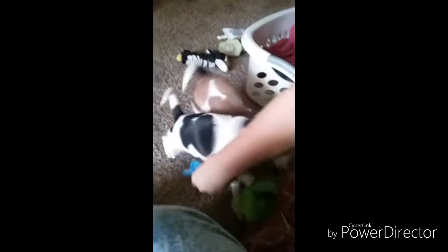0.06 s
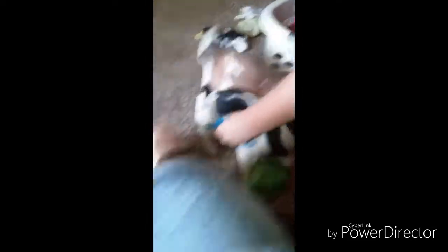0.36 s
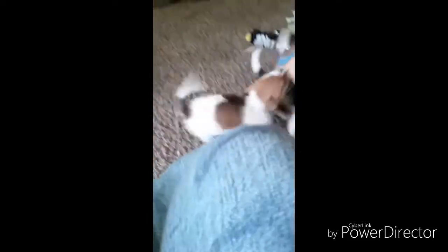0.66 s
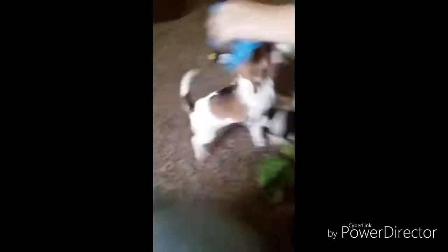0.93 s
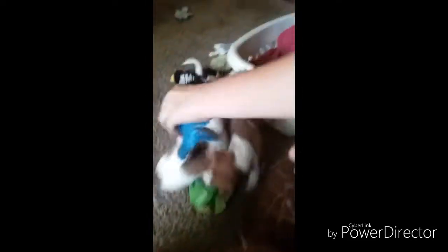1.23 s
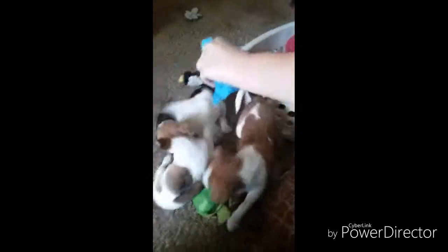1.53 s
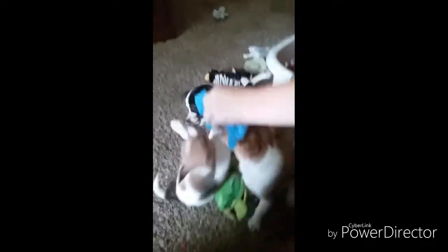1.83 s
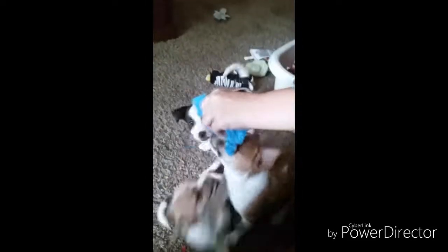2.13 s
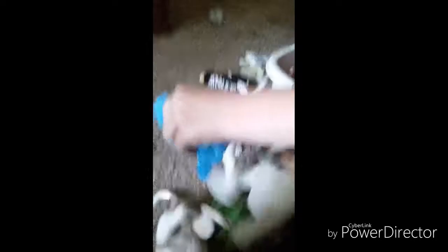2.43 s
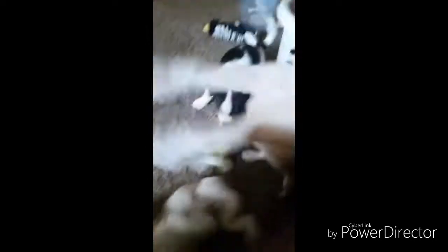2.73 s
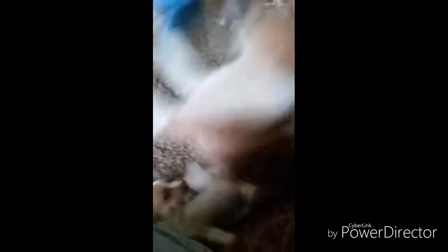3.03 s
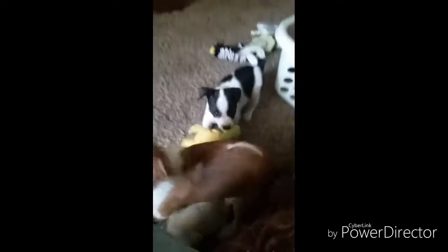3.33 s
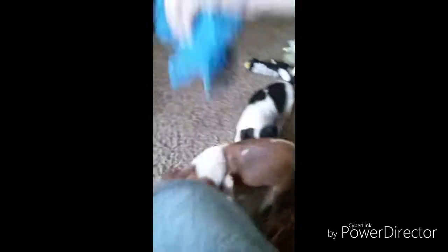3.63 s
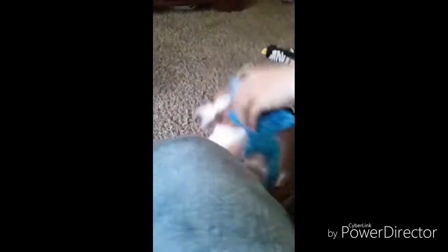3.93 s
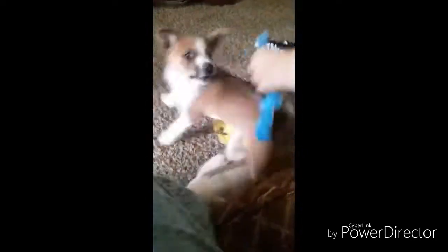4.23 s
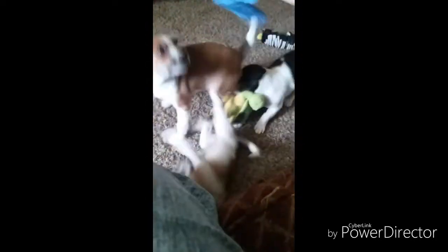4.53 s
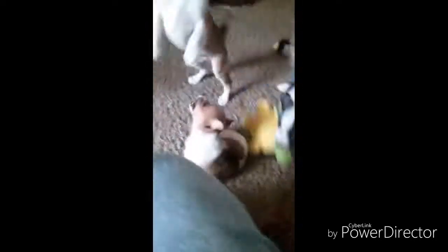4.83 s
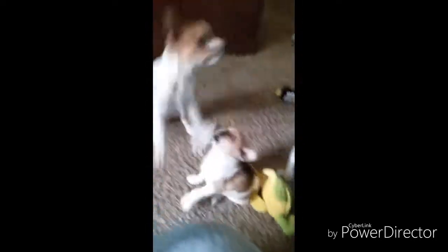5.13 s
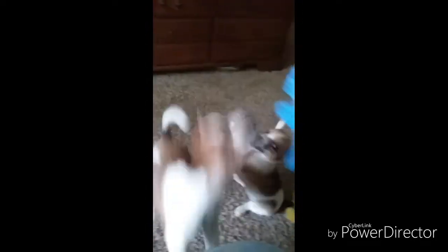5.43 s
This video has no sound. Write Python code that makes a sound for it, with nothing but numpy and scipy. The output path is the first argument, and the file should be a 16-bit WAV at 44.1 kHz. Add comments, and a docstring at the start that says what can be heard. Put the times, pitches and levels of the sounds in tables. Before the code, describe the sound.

A rubber toy squeaks in quick high runs as puppies tug at it, with paws ticking and scuffing on carpet.

```python
"""A rubber squeaky toy, squeezed in quick runs as puppies tug at it on a living-room carpet.
Its reed sounds on each squeeze and again as air flows back; pitch and brightness follow the air pressure.
Down on the floor, toy and paws tick and scuff, and something lands with one soft double knock.
An appliance hums in the background. One microphone with a faint hiss hears it all,
close enough for the direct sound to stand beside the room's short echoes."""
import sys
import numpy as np
from scipy import signal
from scipy.fft import rfft, irfft, next_fast_len
from scipy.io import wavfile
from scipy.ndimage import uniform_filter1d, map_coordinates

SR = 44100
rng = np.random.default_rng(int(sys.argv[2]) if len(sys.argv) > 2 else 0)


def persist_wave(psi):
    """Save psi, clipped to +-1, as 16-bit WAV."""
    counts = np.round(np.clip(psi, -1, 1) * 32767).astype(np.int16)
    wavfile.write(sys.argv[1], SR, np.atleast_2d(counts).T)


N = 245523

# decay of the living room: (frequency [Hz], t60 [s])
ROOM_DECAY = [(300, 0.17), (1500, 0.13), (4000, 0.16), (8000, 0.21), (15000, 0.041)]
# colour of its echoes at the microphone: (frequency [Hz], gain [dB])
ECHO_COLOUR = [(1500, -3), (2000, -1), (3000, -2), (4700, 0), (6000, 2), (9300, 2), (11000, 1.5),
               (14000, -1.5)]
# microphone hiss: (frequency [Hz], relative level [dB])
HISS_COLOUR = [(40, 10), (300, -20), (1500, -8), (5000, -9.5), (10000, 11), (15500, 13)]
# the appliance's rush of air: (frequency [Hz], relative level [dB])
RUMBLE_COLOUR = [(15, -68), (25, -27), (37, -26), (58, -9), (91, 0.5), (112, -7.5), (129, -0.5),
                 (147, -6.5), (262, -13), (289, -11), (393, -13.5), (477, -15.5), (612, -18), (757, -24),
                 (2500, -37.5), (3250, -52.5), (5500, -120)]
# fur and cloth on carpet: (frequency [Hz], relative level [dB])
BRUSH_COLOUR = [(600, -12), (1000, -2.5), (2000, -5), (3000, -2), (4500, -1), (5800, -3), (8000, -7),
                (12500, -11.5), (15500, -11)]
# strokes of fur and cloth: (middle [s], length [s], relative level [dB])
FUR_STROKES = [(0.0, 0.046, -41), (0.53, 0.12, -46.5), (0.637, 0.043, -38.5), (0.71, 0.04, -45),
               (1.33, 0.36, -43.5), (1.552, 0.3, -50), (1.93, .12, -43.5), (2.41, 0.089, -42.5),
               (2.646, 0.065, -40), (2.848, 0.042, -37.5), (2.938, 0.19, -44.5), (3.383, 0.095, -49.5),
               (3.75, 0.11, -43), (3.96, 0.14, -43.5), (4.183, 0.052, -53.5), (4.436, 0.047, -51),
               (4.817, 0.036, -59), (5.107, 0.084, -51)]
# rustle between the strokes: (time [s], relative level [dB])
RUSTLE_FLOOR = [(0, -56.5), (1.2, -51), (2.3, -60.5), (3.2, -60.5), (4.6, -60.5), (5.57, -60)]
# bouts of scrabbling paws: (middle [s], length [s], relative level [dB])
PAW_BOUTS = [(3.376, 0.045, -50), (3.54, 0.041, -45), (4.205, 0.22, -56), (4.404, 0.09, -49.5),
             (4.6, 0.025, -46), (4.82, 0.036, -42.5), (4.92, 0.052, -51), (5.09, 0.095, -56.5)]
# knocks on the floor: (time [s], pitch [Hz], level [dB], t60 [s])
FLOOR_KNOCKS = [(3.338, 213, -27, 0.094), (3.351, 310, -21, 0.044)]
# the clearest ticks of rubber, teeth and claws: (time [s], relative level [dB], treble [dB])
CLEAR_TICKS = [(0.0311, -21.5, -7), (0.5636, -23.5, -3), (1.332, -29, 25), (1.9955, -21, 0.5),
               (2.0705, -21.5, -6), (2.1692, -22.5, -7), (2.195, -31, 5.5), (2.2263, -28, -5.5),
               (2.3563, -22.5, 16), (2.615, -22, 4), (2.6817, -17, -3), (2.814, -16.5, -4.5),
               (2.8274, -24.5, 0), (2.8358, -19.5, -9), (2.858, -17, -16.5), (3.1136, -30, -2),
               (3.1543, -30.5, -8.5), (3.1885, -25.5, -6), (3.25, -31, -9), (3.3056, -21.5, -5.5),
               (3.314, -24.5, -3), (3.3845, -29, 0), (3.4385, -26, -4), (3.46, -23.5, -2),
               (3.5245, -23, -6), (3.548, -29.5, -1), (3.922, -16.5, -6), (4.1654, -30, 7),
               (4.199, -25.5, -13), (4.224, -23.5, -5), (4.388, -23.5, -1), (4.4261, -17.5, 0),
               (4.4748, -28, -7), (4.7653, -27.5, -13.5), (4.8253, -28.5, -6.5), (4.904, -27.5, 4.5),
               (5.106, -27, -9)]
# a tick or a snapping fibre: (frequency [Hz], relative level [dB])
CONTACT_COLOUR = [(500, -57), (900, 2), (1800, -7.5), (3200, -6.5), (4300, -2.5), (5800, -5.5), (9000, -10),
                  (12000, -9), (15500, -9.5)]
# the reed in its housing, two colours mixed by pressure: 1.5 times the first at light pressure, half the first
# plus all of the second at full pressure: (frequency [Hz], relative level [dB])
REED_LIGHT = [(1200, -4), (1500, -8), (2500, -6.5), (3000, -9), (4100, -7.5), (5400, -12), (6800, -12.5),
              (8400, -13), (9600, -11), (11000, -16.5), (15000, -12)]
REED_FULL = [(1200, -8.5), (1500, -7.5), (1900, -8.5), (2600, -11.5), (3300, -9), (4200, -7), (5600, -10.5),
             (6800, -10.5), (8400, -6.5), (9600, -12), (11000, -17), (15000, -22.5)]
# air through the reed: (frequency [Hz], relative level [dB])
AIR_COLOUR = [(800, -46), (1300, -4), (2100, 11), (3000, 5), (4500, 6), (6000, 15), (8500, -42),
              (11000, -21), (15500, -45.5)]
# the grip tightens or slips: (middle [s], length [s], pitch change [Hz], level change [dB])
GRIP_SHIFTS = [(0.147, 0.023, 91.5, 0.5), (0.175, 0.013, -38, 3.5), (0.255, 0.0053, 5, 6),
               (0.273, 0.0072, 42.5, -3), (0.969, 0.0068, 89, -3), (1.087, 0.0079, -51, -4),
               (1.098, 0.015, 46, -1.5), (1.12, 0.013, -8.5, -1.5), (2.963, .072, -112, 0),
               (3.018, 0.0088, 26, -1), (4.005, 0.024, 11, 3)]
# each squeeze or refill; the last four columns say how the toy is held toward the microphone:
# (start [s], length [s], time to crest [s], onset pitch [Hz], crest pitch [Hz],
#  roundness of the fall [1 = straight], crest level [dB],
#  room send [dB], fundamental [dB], presence [dB], edge [dB])
SQUEEZES = [ (0.129, .074, 0.06, 1399, 1607, 2.8, -21, 2.5, 3.5, -2, 2.5),
            (0.242, .073, 0.039, 1274, 1873, 3, -15.5, 2, -1.5, 4, 4),
            (0.391, 0.056, 0.021, 1357, 1395, 0.83, -24.5, -.5, 7, 1, 2),
            (0.452, 0.026, 0.014, 1240, 1251, 1.6, -31, -2, 9.5, 4, 10),
            (0.809, 0.021, 0.006, 1325, 1373, 2.6, -29, 4, -7, -2.5, -10.5),
            (0.918, 0.068, 0.028, 1243, 1896, 3, -15.5, 7.5, -5, 3.5, 1),
            (1.082, 0.084, 0.061, 1370, 1504, 2.5, -20, -2, -2, -6, 0),
            (1.185, 0.076, .033, 1298, 1650, 2.75, -13.5, .5, -5, 3, 0),
            (1.35, 0.071, 0.015, 1356, 1445, 2.63, -22, 3, -1.5, -0.5, -2),
            (1.448, 0.066, 0.046, 1314, 1512, 0.61, -14, -0.5, -6, 2.5, 2.5),
            (1.603, 0.052, 0.014, 1303, 1444, 1.87, -21.5, 0.5, -1.5, 5, 2),
            (1.681, 0.048, .031, 1326, 1412, 0.73, -15.5, 3, -6, 2, 2.5),
            (1.839, 0.034, 0.017, 1366, 1352, 2.6, -25, -1.5, -9.5, -4, -9),
            (1.914, 0.044, 0.017, 1270, 1418, 0.48, -17, 1.5, -5.5, -1, 4.5),
            (2.093, 0.021, 0.0042, 1320, 1346, 1.3, -26, 3, 3, 3, 2.5),
            (2.369, 0.048, 0.026, 1320, 1420, 1.2, -23, 4, 1, -0.5, -2),
            (2.456, 0.048, 0.032, 1283, 1450, 0.54, -15, 1, -1.5, 2, 1.5),
            (2.627, 0.048, 0.018, 1370, 1452, 1.47, -20, -1.5, -4.5, -1, -0.5),
            (2.719, 0.041, 0.028, 1263, 1414, 0.53, -15, -0.5, -3.5, -1, -2),
            (2.875, 0.157, 0.15, 1329, 1381, 1, -21.5, -2, -5, -8, -14.5),
            (3.731, 0.067, .042, 1281, 1660, 2.3, -14, 3, -2, -2, -4.5),
            (3.934, .087, .08, 1313, 1502, 2.1, -18, -5, -6.5, -14.5, -6), ]
STALL_HZ = 1192.7  # the reed stalls at this pitch


def amp(db):
    """Decibels to gain."""
    return 10 ** (np.asarray(db) / 20)


def unit(x):
    """Scale to rms 1."""
    return x / np.sqrt(np.mean(x ** 2) + 1e-20)


def along(points, hz):
    """Read (frequency [Hz], value) points on a log axis."""
    freqs, values = np.transpose(points)
    return np.interp(np.log(hz + 1), np.log(freqs + 1), values)


def wobble(rate, size):
    """A smooth random curve with rate knots a second."""
    knots = rng.standard_normal(size // 16)
    return map_coordinates(knots, [np.arange(size) * rate / SR], mode="mirror")


def filtered(x, gain):
    """Apply a gain that depends on frequency."""
    size = x.shape[-1]
    padded = next_fast_len(size + 4096)
    return irfft(rfft(x, padded) * gain(np.fft.rfftfreq(padded, 1 / SR)), padded)[..., :size]


def coloured(x, colour):
    """Filter by (frequency [Hz], gain [dB]) points."""
    return filtered(x, lambda hz: amp(along(colour, hz)))


def noise(colour, size):
    """Coloured noise of rms 1."""
    return unit(coloured(rng.standard_normal(size), colour))


def add(track, start, sound):
    """Mix a sound into a track at start seconds."""
    part = track[max(round(start * SR), 0):][:len(sound)]
    part += sound[:len(part)]


def bell(t, middle, length):
    """A smooth swell and fade of height 1."""
    return np.exp(-2 * ((t - middle) / length) ** 2)


def swells(t, rows, base_db):
    """Gain of overlapping (middle [s], length [s], level [dB]) swells over a base level."""
    power = sum((amp(db) * bell(t, middle, length)) ** 2 for middle, length, db in rows)
    return np.sqrt(amp(base_db) ** 2 + power)


def room(x, sparse_db=-12, sparse_t60=0.2, wash_db=-13, build_s=0.001):
    """Sparse distinct echoes and a smooth wash die away together; each spot has its own echoes."""
    hz, frame_s, spectrum = signal.stft(rng.standard_normal(SR // 2), SR, nperseg=256)
    decay = amp(-60 * frame_s / along(ROOM_DECAY, hz)[:, None])
    wash = signal.istft(spectrum * decay, SR, nperseg=256)[1]
    t = np.arange(len(wash)) / SR
    sparse = rng.standard_normal(len(t)) * (rng.random(len(t)) < 0.03) * amp(-60 * t / sparse_t60)
    echoes = amp(wash_db) * wash / np.linalg.norm(wash) + amp(sparse_db) * sparse / np.linalg.norm(sparse)
    echoes *= 1 - np.exp(-t / build_s)
    delayed = np.pad(echoes, (SR // 300, 0))  # about a metre further than the direct path
    return coloured(signal.fftconvolve(x, delayed)[:len(x)], ECHO_COLOUR)


def appliance(rumble_db=-45, hum_hz=116.6, hum_db=-47, waver_db=1):
    """In the background, a motor's unsteady hum over its low rush of air."""
    phase = 2 * np.pi * hum_hz * np.arange(N) / SR + wobble(12, N)
    hum = amp(hum_db + waver_db * wobble(22, N)) * np.sqrt(2) * np.sin(phase)
    return hum + amp(rumble_db) * noise(RUMBLE_COLOUR, N)


def scratches(count=900, centre_hz=4500, spread=0.06, t60=0.0097, scatter_db=14):
    """Claws pluck the carpet loops: brief pings at random moments, rms 1."""
    out, t = np.zeros(N), np.arange(SR // 30) / SR
    for when, pitch, weakness in rng.random((count, 3)):
        hz = centre_hz * np.exp(spread * (2 * pitch - 1))
        envelope = amp(-scatter_db * weakness - 60 * t / t60)
        add(out, when * N / SR, envelope * np.sin(2 * np.pi * hz * t))
    return unit(out)


def scuffs(flutter_db=4, snaps_per_s=220, brush_db=-2.5, snap_db=-11, scratch_db=-10, pawing_db=-70):
    """Fur and cloth brush the carpet: a fluttering rustle with fibres snapping and claws scratching."""
    t = np.arange(N) / SR
    motion = swells(t, FUR_STROKES, np.interp(t, *np.transpose(RUSTLE_FLOOR)))
    snaps = rng.uniform(-0.73, 1, N) * (rng.random(N) < snaps_per_s / SR)
    fibres = unit(coloured(snaps, CONTACT_COLOUR))
    rustle = amp(brush_db) * noise(BRUSH_COLOUR, N) + amp(snap_db) * fibres
    claws = np.hypot(amp(scratch_db) * motion, swells(t, PAW_BOUTS, pawing_db)) * scratches()
    flutter = amp(flutter_db * np.tanh(wobble(45, N)))
    return flutter * (motion * rustle + claws)


def bump(attack_s=0.0024):
    """A soft double knock on the carpeted floor: two low, quickly damped tones."""
    out, t = np.zeros(N), np.arange(SR // 5) / SR
    for start, hz, db, t60 in FLOOR_KNOCKS:
        envelope = amp(db - 60 * t / t60) * (1 - np.exp(-t / attack_s))
        add(out, start, envelope * np.sin(2 * np.pi * hz * t))
    return out


def faint_ticks(count=30, loudest_db=-32, scatter_db=5.5, treble_db=2):
    """Light contacts at random moments: (time [s], relative level [dB], treble [dB])."""
    return [(when * N / SR, loudest_db - scatter_db * weakness, treble_db)
            for when, weakness in rng.random((count, 2))]


def ticks(t60=0.008, attack_s=0.00032, scrape_db=-15, scrape_t60=0.052, gain_db=-6):
    """Small dry contacts, each with its own brightness and a short scrape as it slides off."""
    out, t = np.zeros(N), np.arange(SR // 10) / SR
    for start, db, treble_db in CLEAR_TICKS + faint_ticks():
        tilt = [(1500, -8.5), (4500, 0), (11000, treble_db)]
        grain = unit(coloured(noise(CONTACT_COLOUR, len(t)), tilt))
        scrape = amp(scrape_db - 60 * t / scrape_t60 + 6 * np.tanh(wobble(170, len(t))))
        envelope = (amp(-60 * t / t60) + scrape) * (1 - np.exp(-t / attack_s))
        add(out, start, amp(db + gain_db) * envelope * grain)
    return out


def grip(t):
    """Changes of pitch [Hz] and level [dB] as the grip on the toy shifts."""
    return sum(np.outer([hz, db], bell(t, middle, length)) for middle, length, hz, db in GRIP_SHIFTS)


def voice_db(hz, stall_loss_db=17, recovery_hz=146):
    """The reed is weak near its stall and gains full voice as pressure and pitch go up."""
    return -stall_loss_db * np.exp(-np.maximum(hz - STALL_HZ, 0) / recovery_hz)


def squeeze(t, length, crest_s, onset_hz, crest_hz, roundness, crest_db, ease=1.08):
    """Pitch [Hz] and drive [dB] of one push of air: the reed climbs to a crest, then falls to stall."""
    rise = np.clip(t / crest_s, 0, 1)
    fall = np.clip((t - crest_s) / max(length - crest_s, 1 / SR), 0, 1)
    climb_hz = crest_hz - (crest_hz - onset_hz) * (1 - rise) ** ease
    drop_hz = (crest_hz - STALL_HZ) * fall ** roundness
    return climb_hz - drop_hz, crest_db - voice_db(crest_hz)


def reed(hz, level_db, light_db=-24, full_db=-16, sway_db=2.5, lag_rad=0.099):
    """The reed chops the air stream into a stack of harmonics whose balance follows the pressure."""
    pressure = np.clip((level_db - light_db) / (full_db - light_db), 0, 1)
    harmonics = np.arange(1, 14)[:, None]
    freqs = harmonics * hz
    colour_db = (1.5 - pressure) * along(REED_LIGHT, freqs) + pressure * along(REED_FULL, freqs)
    # hand and cloth move around the outlet, so each harmonic swells and fades by itself
    sway = sway_db * np.array([wobble(93.5, len(hz)) for _ in harmonics])
    gains = amp(colour_db + sway)
    gains = gains * (freqs < SR / 2) / np.linalg.norm(gains, axis=0)
    # the housing delays the upper harmonics, which spreads each puff
    phases = 2 * np.pi * harmonics * np.cumsum(hz) / SR - lag_rad * harmonics ** 2
    return np.sqrt(2) * np.sum(gains * np.cos(phases), axis=0)


def squeak(start, push, attack_s=0.0019, release_s=0.001, air_db=-33,
           jitter=0.0036, rasp=0.0075, chatter=0.12, overblown_hz=1550):
    """One squeak right at the outlet: the reed's tone with a little rushing air."""
    length, size = push[0], SR // 6
    t = np.arange(size) / SR
    push_hz, drive_db = squeeze(t, *push)
    grip_hz, grip_db = grip(start + t)
    hz = uniform_filter1d(push_hz + grip_hz, size=300)
    level_db = drive_db + grip_db + voice_db(hz)
    # driven to its highest notes, the reed beats unevenly and rasps
    overblown = np.clip((hz - overblown_hz) / 250, 0, 1)
    hz = hz * (1 + jitter * wobble(684, size) + rasp * overblown * wobble(1620, size))
    tone = reed(hz, level_db) * (1 + chatter * overblown * wobble(1400, size))
    gate = np.clip(t / attack_s, 0, 1) * np.clip((length + release_s - t) / release_s, 0, 1)
    return gate * amp(level_db) * (tone + amp(air_db) * noise(AIR_COLOUR, size))


def toy():
    """All squeaks; aimed off the microphone, the toy comes more by way of the room, its glides smeared."""
    out = np.zeros(N)
    for start, *push, send_db, low_db, presence_db, edge_db in SQUEEZES:
        outlet = np.pad(squeak(start, push), (0, SR // 2))
        # hand and floor colour the straight path; the room hears the whole toy
        top_db = -5 + 0.7 * edge_db
        colour = [(1800, low_db), (2700, 0.0028), (4300, 0.01), (5500, presence_db), (7000, presence_db),
                  (8300, edge_db), (9800, edge_db), (12000, top_db), (15000, top_db - 4)]
        direct = coloured(outlet, colour)
        direct *= np.linalg.norm(outlet) / np.linalg.norm(direct)
        at_mic = direct + amp(send_db) * room(outlet)
        add(out, start, at_mic / np.hypot(1, amp(send_db - 5)))  # more room, about the same loudness
    return out


def scene(hiss_db=-66, contact_send_db=-1.5):
    """The living room from one microphone, the same in both channels."""
    contacts = ticks() + bump()
    play = toy() + contacts + amp(contact_send_db) * room(contacts) + scuffs()
    mono = play + appliance() + amp(hiss_db) * noise(HISS_COLOUR, N)
    return np.array([mono, mono])


def record(dry, top_hz=15800):
    """The phone keeps nothing above its band limit."""
    return filtered(dry, lambda hz: hz < top_hz)


dry = scene()
out = record(dry)
persist_wave(out)
```